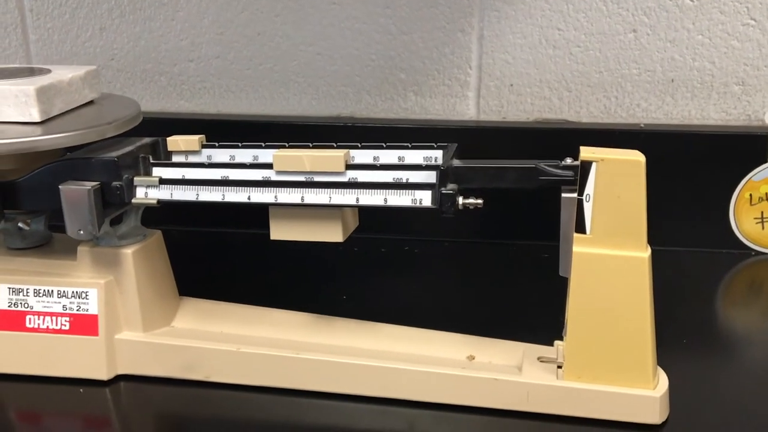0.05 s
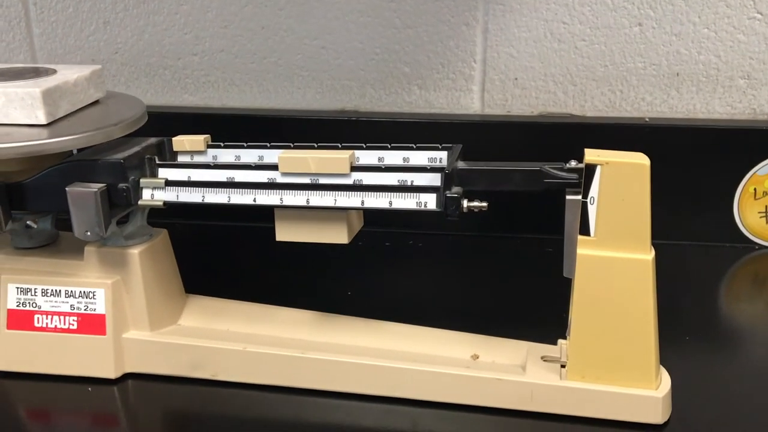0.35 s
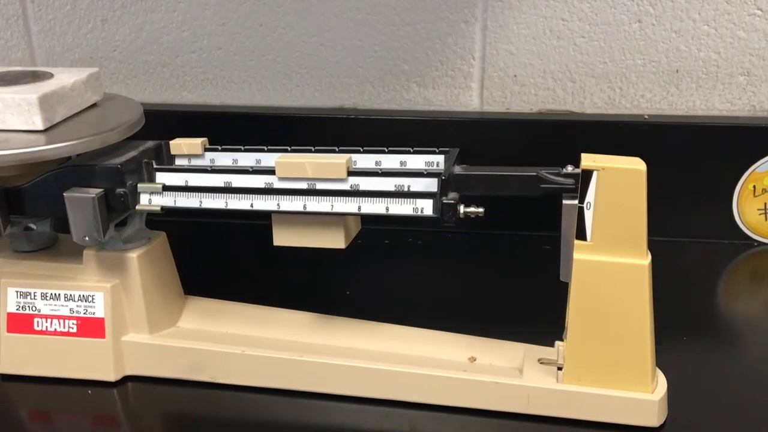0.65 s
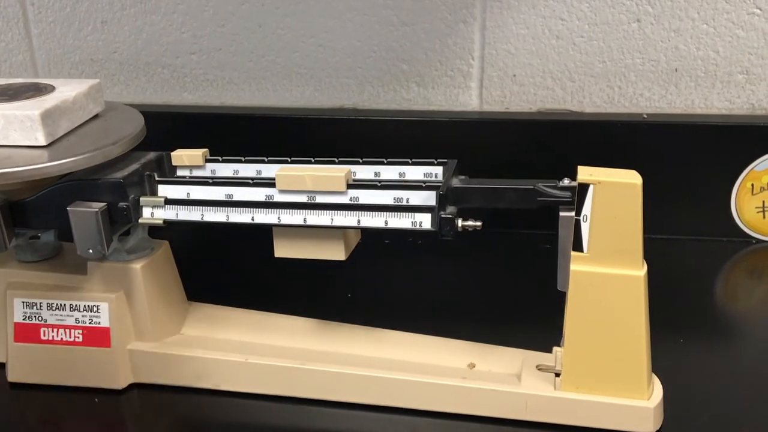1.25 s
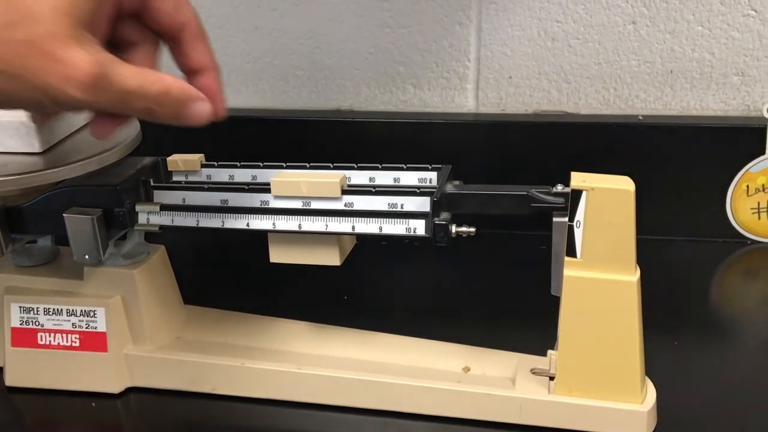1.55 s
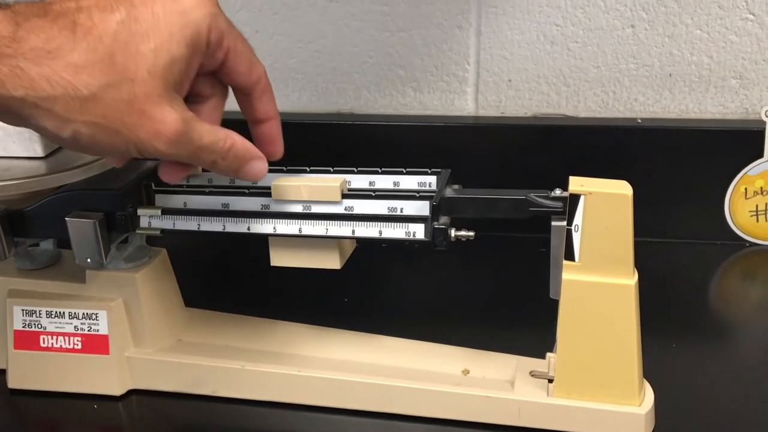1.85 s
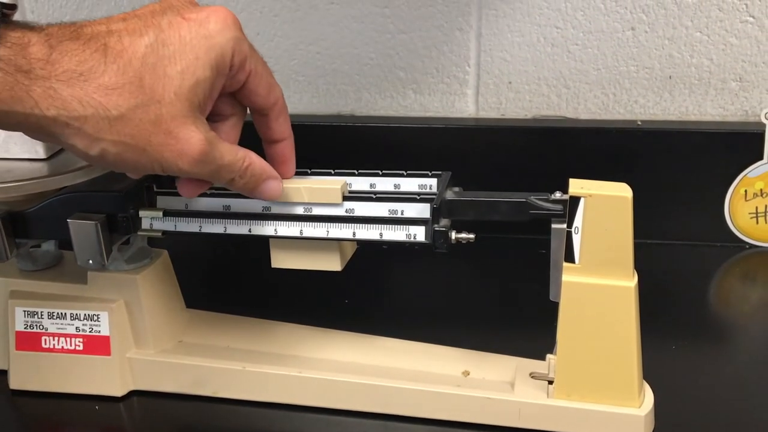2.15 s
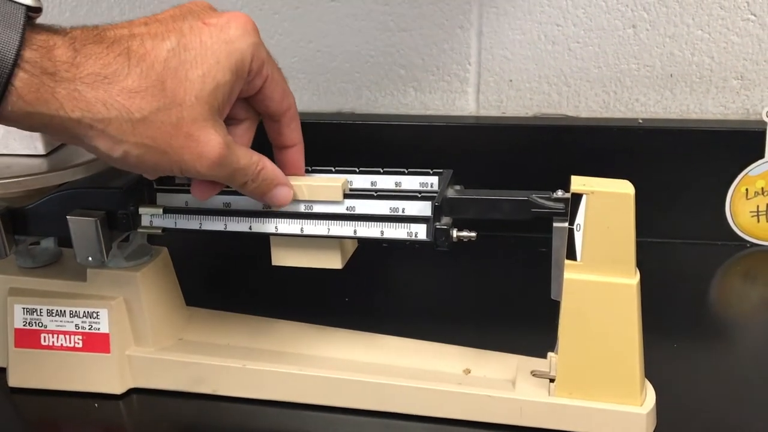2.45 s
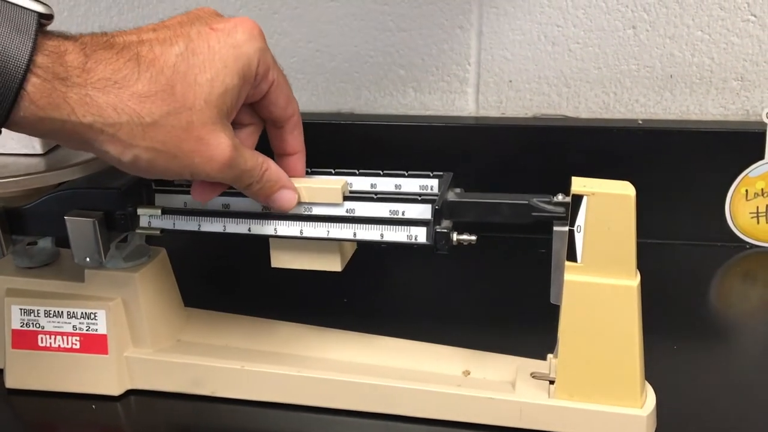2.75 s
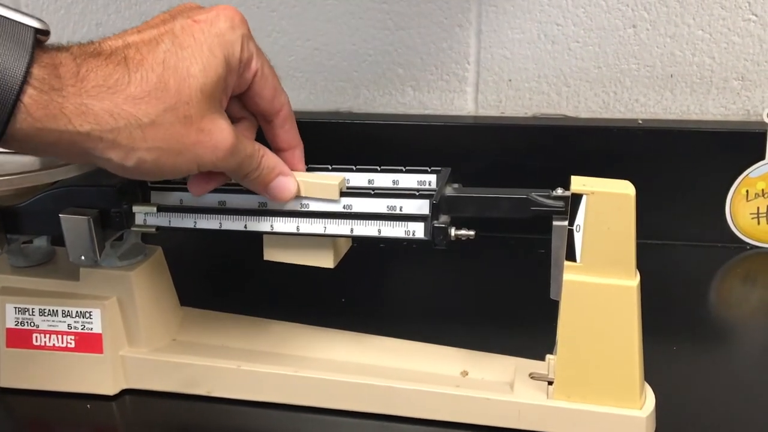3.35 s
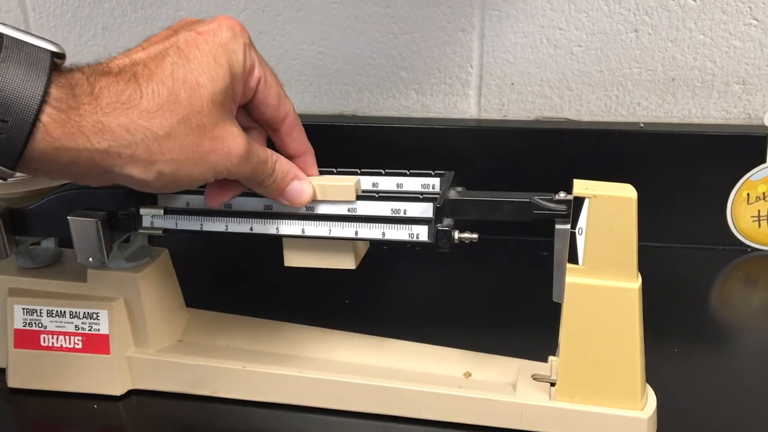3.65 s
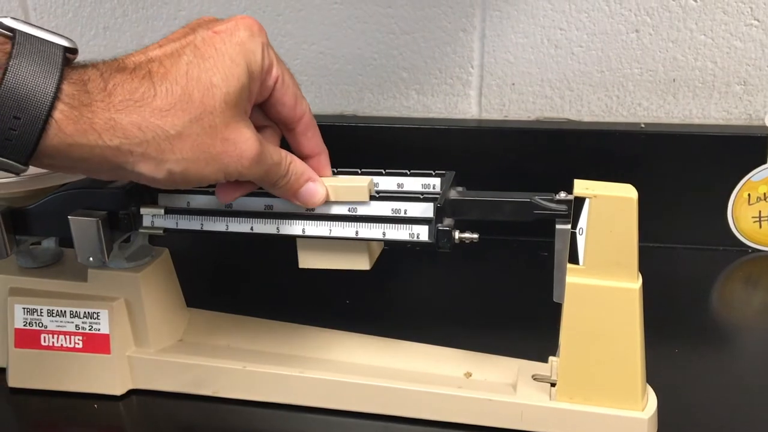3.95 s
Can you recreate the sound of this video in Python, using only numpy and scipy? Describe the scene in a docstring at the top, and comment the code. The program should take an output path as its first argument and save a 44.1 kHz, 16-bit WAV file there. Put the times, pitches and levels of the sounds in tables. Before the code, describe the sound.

A metal weight clacks from notch to notch along a lab balance beam.

```python
"""Sliding a weight on a lab balance

Close by in a quiet room, a hand slides a weight along a notched metal beam. At each notch the weight
drops with a clack: the beam rings, the base and bench thud, the room answers briefly.
Before that, a sleeve rustles and a faint low drone swells and fades, like furniture dragged in
another room. Ventilation rumbles throughout."""
import sys
import numpy as np
from scipy import signal
from scipy.fft import rfft, irfft
from scipy.io import wavfile
from scipy.ndimage import uniform_filter1d

SR = 44100
rng = np.random.default_rng(int(sys.argv[2]) if len(sys.argv) > 2 else 0)


def transcribe(signal):
    """Save signal, clipped to [-1, 1], as a 16-bit WAV file at the path in sys.argv[1]."""
    frames = np.atleast_2d(signal).T
    limited = np.clip(frames, -1, 1)
    pcm = np.round(limited * 32767).astype(np.int16)
    wavfile.write(sys.argv[1], SR, pcm)


N = 176400
T = np.arange(N) / SR


def notch_drops():
    """The weight scrapes down the edge of a notch and lands, shaking the beam, base and frame."""
    # Each landing: start_s, boom_db, thud_db, body_db, clack_db, tick_db, ring_db, snap_db,
    # beam_hz, base_hz, contact_s, scrape_db
    landings = [ (2.2945, -43.5, -42, -44.5, -39, -58.5, -47, -44, 2130, 594, 0.0029, -61),
                (2.5565, -38.5, -40, -42.5, -33.5, -50.5, -43.5, -30.5, 1690, 588, 0.0014, -56),
                (2.784, -56, -60, -57.5, -62.5, -77, -61, -58, 1310, 640, .001, -82),
                (2.8632, -38, -39, -40, -28, -44.5, -39, -23.5, 1624, 250, 0.0012, -53),
                (2.915, -46, -37, -47, -34.5, -56, -42, -32, 1696, 277, 0.0022, -65),
                (2.942, -41, -43.5, -45, -44.5, -66, -57, -53, 1460, 190, 0.0016, -65),
                (3.2402, -40, -34.5, -35, -28.5, -41.5, -29.5, -15, 1597, 303, 0.0013, -48),
                (3.432, -62, -53, -62.5, -56, -69, -60, -59, 2620, 248, 0.0024, -78),
                (3.505, -43, -42.5, -39, -46, -43.5, -39, -47, 2500, 249, 0.0023, -47.5),
                (3.511, -42, -35, -42, -32.5, -40.5, -36, -45, 2440, 270, 0.003, -43),
                (3.562, -40.5, -38.5, -41.5, -46, -79, -62, -26, 270, 263, .003, -74),
                (3.640, -49, -42, -38, -38, -70, -53, -58, 890, 250, 0.011, -59),
                (3.6615, -45.5, -39, -36.5, -28.5, -39.5, -34, -21, 902, 190, 0.0018, -41),
                (3.9085, -65, -41, -59, -40.5, -43, -41, -26.5, 1496, 188, 0.0026, -46.5)]
    # Ringing tones of the metal beam and pan: pitch_hz, level_db, fade_s
    beam_tones = [(841.4, -2.5, 0.21), (897, -9, 0.27), (1050.5, 4.5, 0.16), (1360, 0.5, 0.088),
                  (1496, -0.5, 0.075), (1613, -4.5, 0.16), (2028, 5.5, 0.061), (2324, 3, .12),
                  (2520, 0.5, 0.13), (2693, -4, 0.18), (3620, -13.5, 0.18), (4040, -10.5, 0.078),
                  (4600, -23, 0.13), (12500, -25, .11)]
    # Ringing tones of the hollow base: pitch_hz, level_db, fade_s
    base_tones = [(188.4, -9.5, 0.38), (248.7, -8, 0.45), (312, -6.5, 0.21), (508.3, -11.5, 0.32),
                  (551.7, -9, 0.35), (638.2, -4, 0.19)]
    # Tone colour of the scrape: pitch_hz, level_db
    scrape_colour = [(500, 0), (1200, 0), (2500, -3), (3100, -9), (4200, -11.5), (6800, -13), (8000, -21),
                     (15000, -29)]
    out, scrape_level = np.zeros(N), np.zeros(N)
    t = T[:SR // 2]
    for start_s, *frame_db, ring_db, snap_db, beam_hz, base_hz, contact_s, scrape_db in landings:
        thud_db = frame_db[1]
        snap_level = undb(snap_db) * rise(t, 0.00093) * fade(t, 0.023)
        snap = snap_level * np.sin(2 * np.pi * beam_hz * t)
        beam = undb(ring_db) * ring(t, beam_tones, beam_hz)
        base = undb(thud_db + 3.5) * rise(t, 0.0013) * ring(t, base_tones, base_hz)
        add(out, start_s, rise(t, contact_s / 2) * (snap + beam + base + frame(t, frame_db)))
        # The scrape swells and dies within moments, peaking as the weight lands.
        scrape_level += undb(scrape_db) * np.exp(-np.abs(T - start_s) / 0.0056)
    return out + scrape_level * noise(scrape_colour)


def ring(t, tones, favoured_hz):
    """A struck part rings with several tones; the spot that is hit favours those near one pitch."""
    favour_db, favour_octaves, scatter_db = 6.5, 0.14, 2.5
    hz, db, fade_s = np.repeat(tones, 2, axis=0).T[:, :, None]
    nearness = np.exp(-(np.log2(hz / favoured_hz) / favour_octaves) ** 2)
    gain = undb(db + favour_db * (nearness - 1) + scatter_db * rng.standard_normal(hz.shape))
    # Each tone is a pair, put slightly out of tune by the grip, so it wavers.
    hz = hz * (1 + 0.0059 * rng.standard_normal(hz.shape))
    waves = np.sin(np.float32(2 * np.pi * (hz * t + rng.random(hz.shape))))
    return np.sum(gain * fade(t, fade_s) * waves, axis=0) / np.sqrt(2)


def frame(t, levels_db):
    """The frame and bench answer a blow with a quick rattle and a faint room echo."""
    # Rattle bands: low_hz, high_hz, which_level (rounded: 0 boom, 1 thud, 2 body, 3 clack, 4 tick),
    # level_db, rise_s, fade_s, echo_db, echo_fade_s
    bands = [ (58, 122, 0, -1.5, 0.0069, 0.34, -11, 0.47), (125, 370, 1, 0.5, .006, 0.14, -13, 0.62),
             (363, 1007, 2.5, 1, 0.0031, 0.098, -9, 0.34), (930, 1825, 3, -1, 0.00057, 0.07, -15.5, 0.31),
             (1820, 2554, 3, -3.5, 0.00029, .062, -19.5, 0.33),
             (2660, 3100, 4, -7.5, .001, 0.081, -13, 0.32),
             (3500, 4560, 4, -1.5, 0.0018, 0.091, -20.5, 0.31),
             (4950, 7100, 4, -5.5, 0.00077, 0.071, -19.5, 0.35),
             (7360, 10900, 4, -11, .001, 0.061, -11, 0.18), (11000, 14800, 4, -16, .001, 0.084, -16, 0.25)]
    out = 0
    for low_hz, high_hz, which_level, db, rise_s, fade_s, echo_db, echo_fade_s in bands:
        echo = undb(echo_db) * fade(t, echo_fade_s)
        shape = rise(t, rise_s) * np.hypot(fade(t, fade_s), echo)
        gain = undb(levels_db[int(round(which_level))] + db)
        out = out + gain * shape * rattle(low_hz, high_hz, len(t))
    return out


def rattle(low_hz, high_hz, size):
    """Countless close tones at an even strength; chance makes some stand out, most of all high ones."""
    clink_db, clink_width_hz, treble_hz = 8.5, 90, 3500
    hz = np.arange(size // 2 + 1) * SR / size
    bumps = np.interp(hz / clink_width_hz, np.arange(1024), rng.standard_normal(1024))
    clinks = undb(clink_db * np.minimum(hz / treble_hz, 1) * bumps)
    band = 1 / np.sqrt((1 + (hz / high_hz) ** 50) * (1 + (low_hz / (hz + 1)) ** 30))
    x = irfft(rfft(rng.standard_normal(size)) * band * clinks, size)
    span = int(SR * max(.008, 4 / (high_hz - low_hz)))
    strength = np.sqrt(uniform_filter1d(x ** 2, span) + 1e-18)
    return x / strength


def slide():
    """The weight rubs faintly and unevenly along the beam."""
    # Loudness of the rubbing: time_s, level_db
    levels = [(2.7, -102), (2.82, -63), (3.1, -80), (3.4, -69), (3.6, -59), (3.78, -61.5), (3.88, -60.5),
              (4.0, -68)]
    # Its tone colour: pitch_hz, level_db
    colour = [(300, 10), (900, 3.5), (1900, -3.5), (2550, -1), (2900, -29), (3800, -11), (4300, -9),
              (5000, -17), (7500, -19.5), (9200, -15), (11000, -24), (15000, -26)]
    return noise(colour) * undb(curve(levels) + 3.5 * wander(rate_hz=90))


def drone():
    """A distant low judder that sags in pitch, with overtones at its loudest."""
    # Course of the drone: time_s, pitch_hz, low_tone_db, overtones_db
    course = [(0, 86, -61, -84), (.09, 86.07, -48.5, -77), (.17, 85, -50.5, -67), (.21, 83.4, -81, -64),
              (.3, 78.06, -62, -76), (.38, 77.23, -45.5, -69), (.5, 75.1, -48, -57.5),
              (.6, 73.85, -45, -75), (.66, 72.47, -53.5, -55), (.72, 72.4, -47, -49), (.79, 72, -39, -52),
              (.87, 70.6, -41, -54), (.94, 72.3, -53, -61), (1.05, 71.2, -78, -63)]
    # Higher tones above it: pitch_multiple, level_db
    overtones = [(2, -9), (3, -2), (4, -5), (5, -23)]
    pitch_wobble, flutter_db = 0.011, 1.5
    pitch_hz = curve(course) * (1 + pitch_wobble * wander(rate_hz=30))
    phase = 2 * np.pi * np.cumsum(pitch_hz) / SR
    low = undb(curve(course, column=2) + flutter_db * wander(24.7)) * np.sin(phase)
    upper = sum(undb(db + flutter_db * wander(20)) * np.sin(round(k) * phase) for k, db in overtones)
    ending = fade(np.maximum(T - course[-1][0], 0), 0.84)
    return np.sqrt(2) * (low + undb(curve(course, column=3)) * upper) * ending


def ticks():
    """Tiny dry ticks before the hand arrives, barely louder than the room."""
    # Each tick: start_s, level_db
    events = [(.728, -65.5), (.815, -64), (0.927, -62.5)]
    # Their tone colour: pitch_hz, level_db
    colour = [(900, 0), (1800, -1.5), (3500, -8), (6500, -9), (9000, -20), (15000, -26)]
    level = sum(undb(db) * (T >= start_s) * fade(np.abs(T - start_s), 0.079) for start_s, db in events)
    return noise(colour) * level


def sleeve():
    """A sleeve rustles softly as the arm comes in."""
    # Loudness of the rustle: time_s, level_db
    levels = [(.6, -87), (1.1, -73), (1.35, -72), (1.6, -70.5), (1.8, -81), (2.2, -92)]
    # Its tone colour: pitch_hz, level_db
    colour = [(400, -12), (1800, 2), (4000, -6.5), (8000, -9), (15000, -10.5)]
    return noise(colour) * undb(curve(levels))


def ventilation():
    """Moving air rumbles and hisses, wavering slightly."""
    # Tone colour of the air: pitch_hz, level_db
    colour = [(40, -10.5), (60, -1.5), (110, -0.5), (145, -7.5), (245, -6), (330, -10.5), (450, -19.5),
              (700, -22), (1200, -30), (2200, -33), (4500, -38), (7500, -42.5), (8900, -39), (11000, -43),
              (15500, -47.5)]
    level_db, waver_db = -55, 1.14
    return noise(colour) * undb(level_db + waver_db * wander(rate_hz=5.78))


def undb(db):
    """Turn decibels into a multiplier."""
    return 10 ** (np.asarray(db) / 20)


def fade(t, fade_s):
    """Die away by 60 dB in fade_s seconds."""
    return np.exp(-np.log(1000) * t / fade_s)


def rise(t, rise_s):
    """Climb smoothly from 0 towards 1."""
    return 1 - np.exp(-t / max(rise_s, 1e-5))


def curve(rows, column=1):
    """Join one column of a time table with straight lines."""
    rows = np.array(rows)
    return np.interp(T, rows[:, 0], rows[:, column])


def wander(rate_hz):
    """Smooth random drift with a spread of 1."""
    span = int(SR / rate_hz)
    steps = np.repeat(rng.standard_normal(N // span + 1), span)
    drift = uniform_filter1d(uniform_filter1d(steps, span), span)[:N]
    return drift / drift.std()


def noise(colour):
    """Noise of strength 1, shaped by rows of pitch_hz, level_db."""
    points_hz, db = np.array(colour).T
    hz = np.maximum(np.arange(N // 2 + 1) * SR / N, 1)
    gain = undb(np.interp(np.log(hz), np.log(points_hz), db))
    bass_cut = np.minimum(hz / points_hz[0], 1) ** 4
    x = irfft(rfft(rng.standard_normal(N)) * gain * bass_cut, N)
    return x / x.std()


def add(out, start_s, x):
    """Mix a sound in at its start time."""
    i = int(start_s * SR)
    out[i:i + len(x)] += x[:N - i]


def scene():
    """The balance in its room, in mono."""
    return (notch_drops() + ticks() + ventilation() + sleeve() + slide() + drone())[None]


def record(dry):
    """Cut away the very highest treble."""
    top_hz = 15700
    return signal.sosfilt(signal.ellip(10, .2, 70, top_hz, fs=SR, output="sos"), dry)


dry = scene()
out = record(dry)
transcribe(out)
```